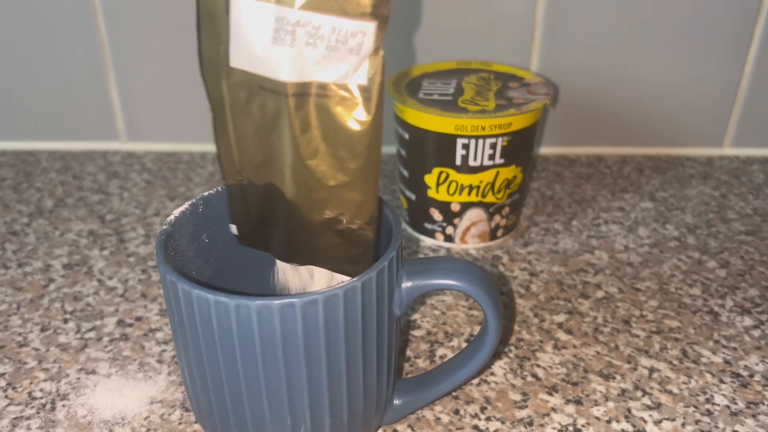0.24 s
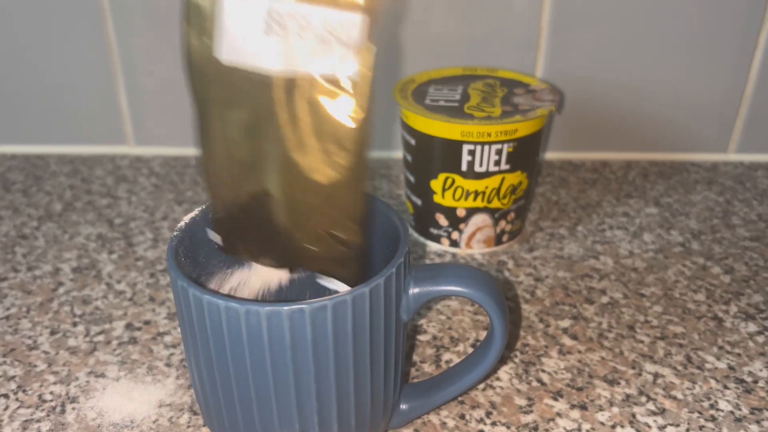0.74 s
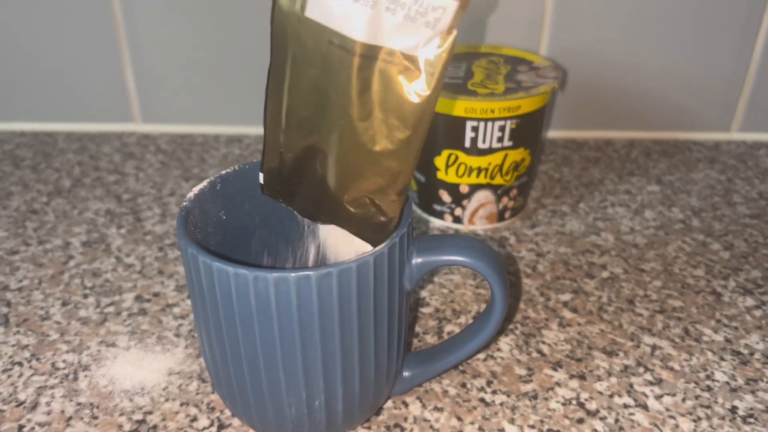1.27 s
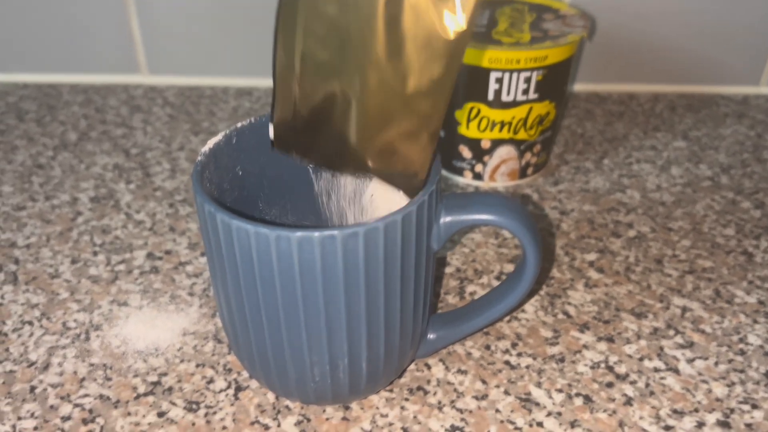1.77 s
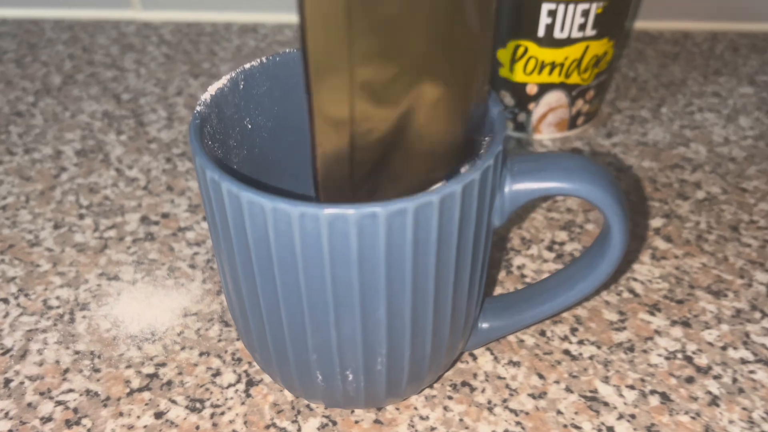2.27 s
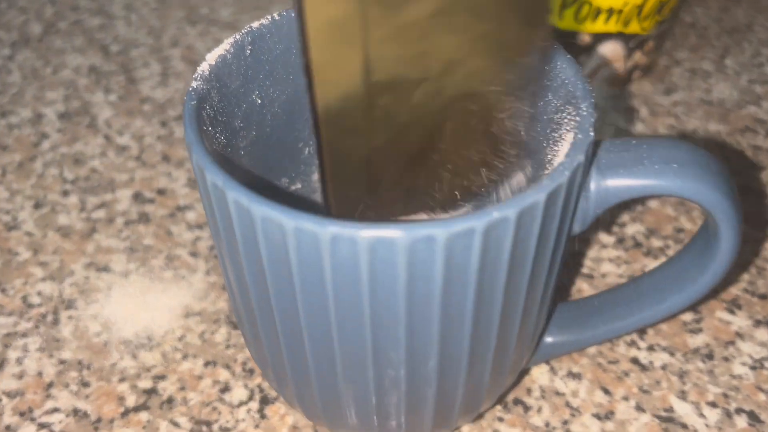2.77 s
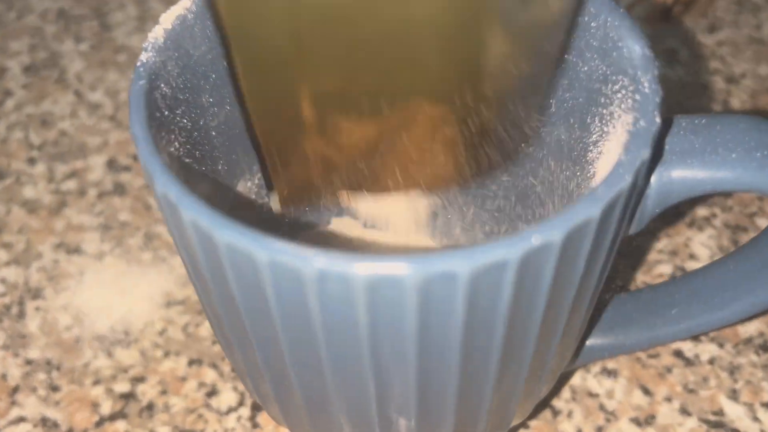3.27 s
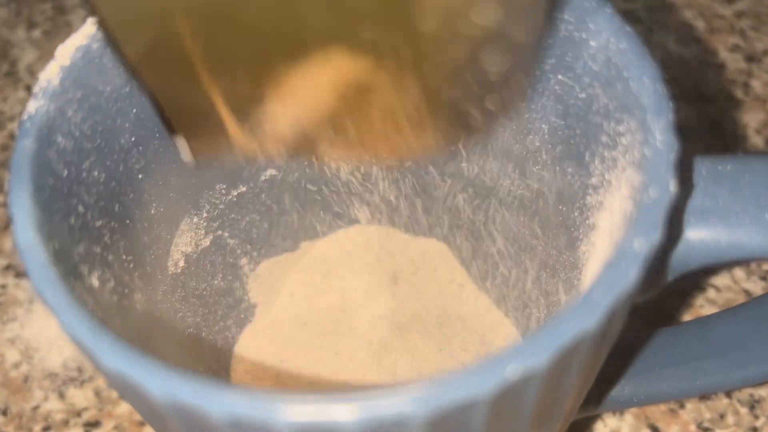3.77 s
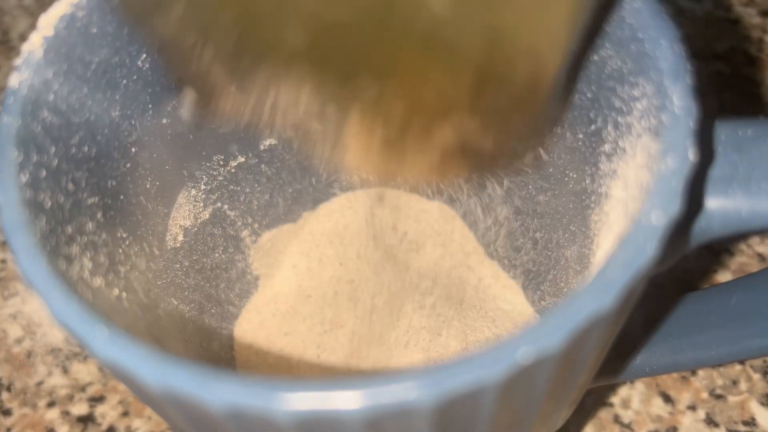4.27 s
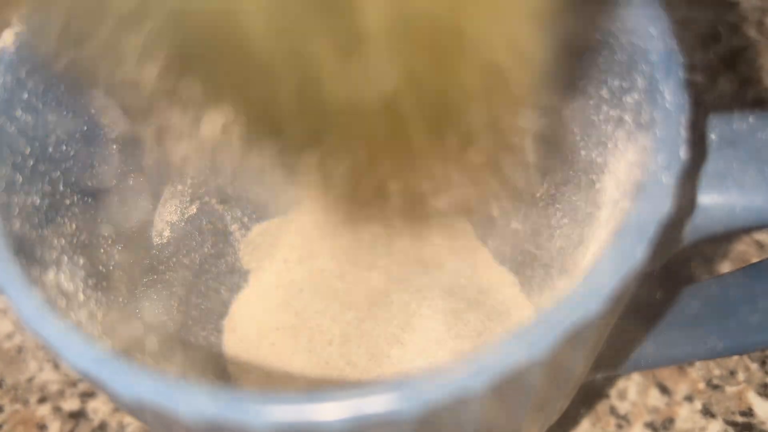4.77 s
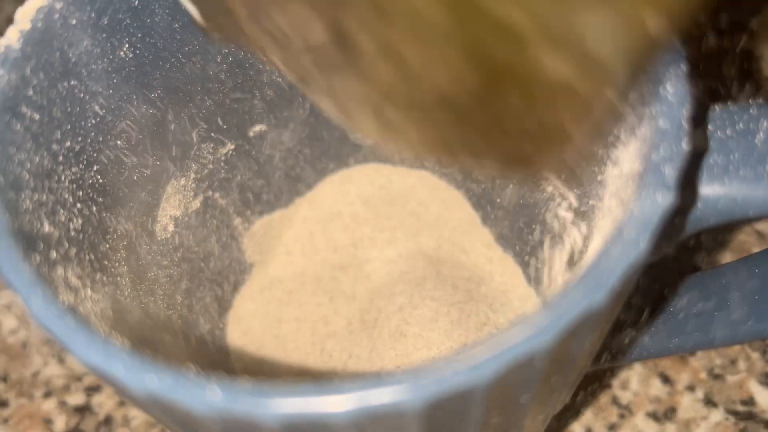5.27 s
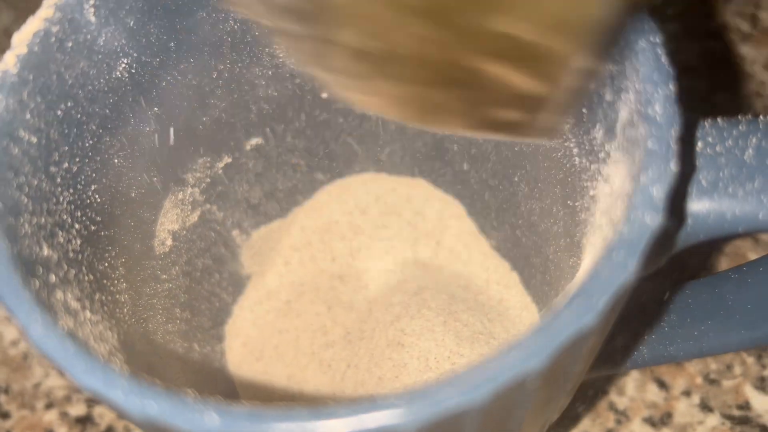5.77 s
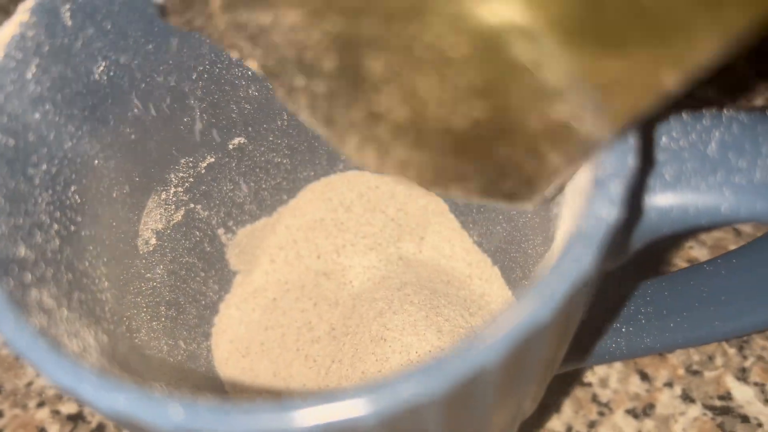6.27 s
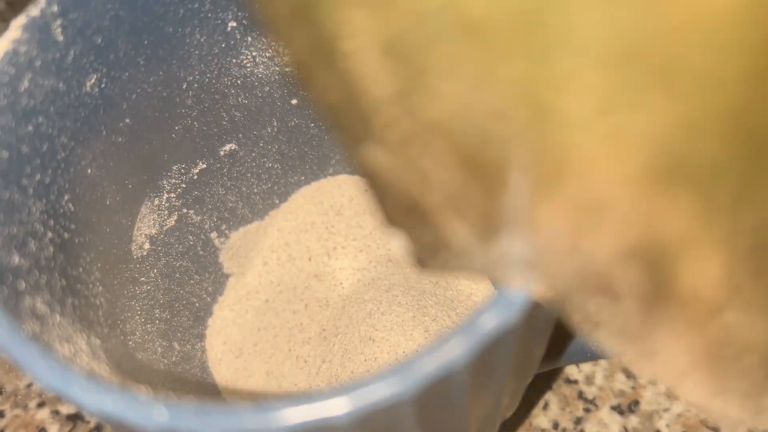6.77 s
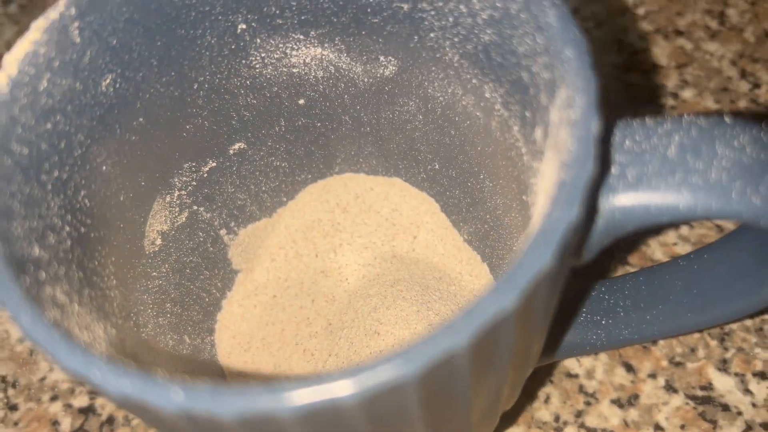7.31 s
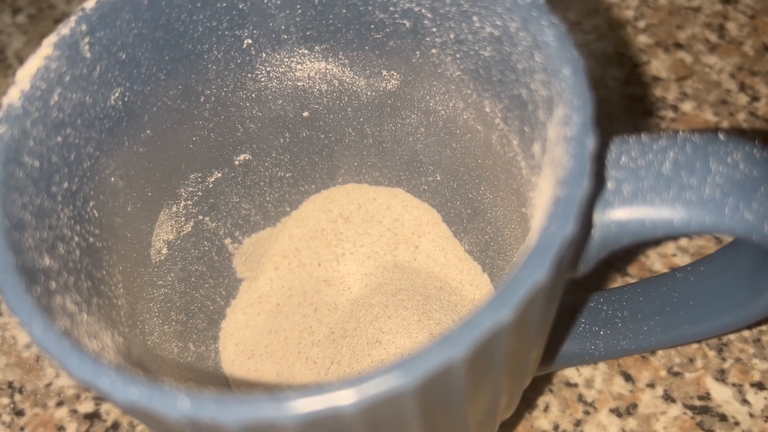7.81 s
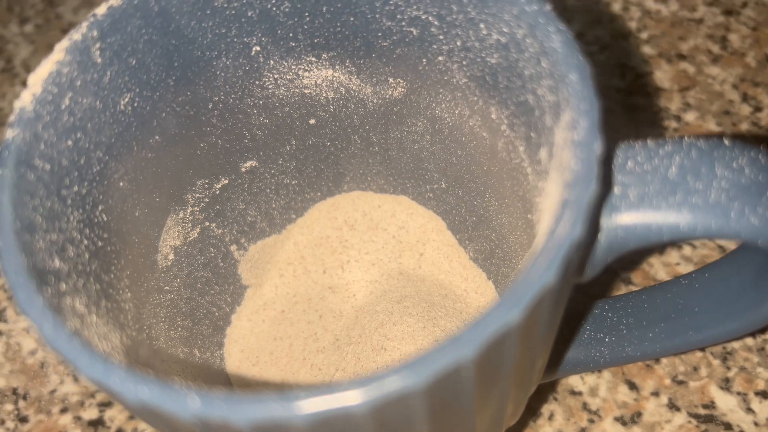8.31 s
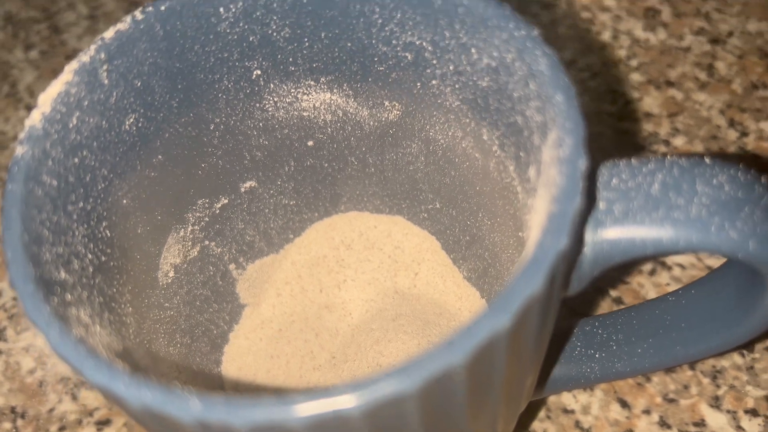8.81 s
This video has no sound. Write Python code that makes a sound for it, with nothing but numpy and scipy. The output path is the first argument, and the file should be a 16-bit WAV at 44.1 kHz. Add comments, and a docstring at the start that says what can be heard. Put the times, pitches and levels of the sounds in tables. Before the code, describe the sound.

A close stereo microphone hears soft powder trickling in gushes and light, regular finger taps on a foil packet. The packet is then shaken harder and faster over a mug, its walls thudding, popping and slapping with a papery, hollow sound that turns brighter as it empties. A short coarse scrape follows as it is pulled away, then crisp foil crackling, a few stray creases, and near silence with a short kitchen echo.

```python
"""A foil sachet of powder is emptied into a mug on a kitchen counter, close to the microphone.
Over a thin hiss of powder (filtered grains) come finger taps, then a few faint knocks (ringing noise bursts).
Shakes grow harder: the walls whump (gliding sines into a ringing hollow), pop, slap and tick, and the last
powder slides down the foil. The sachet then rasps as it is pulled away, and is crumpled: creases snap
and their facets ring briefly. Room tone and the low stir of handling run underneath."""
import sys
import numpy as np
from scipy import signal
from scipy.fft import rfft, irfft, next_fast_len
from scipy.io import wavfile
from scipy.ndimage import map_coordinates

SR = 44100
rng = np.random.default_rng(int(sys.argv[2]) if len(sys.argv) > 2 else 0)


def wav_record(signal):
    """Record a signal, one row per channel, as 16-bit PCM in the file named by sys.argv[1]."""
    frames = np.transpose(np.atleast_2d(signal))
    bounded = np.clip(frames, -1, 1)
    # unit amplitude maps onto the largest positive 16-bit level
    quanta = np.round(bounded * 32767).astype(np.int16)
    wavfile.write(sys.argv[1], SR, quanta)


N = 399105
TIME = np.arange(N) / SR

# Event and curve levels are cue levels: each function adds its own trim in dB.
# The hand and the moving sachet stir the air: start_s, level_db
STIR_CURVE = [(0, -60.5), (1.9, -58), (2.6, -59.5), (4.3, -50.5), (4.85, -49.5), (5.3, -47), (6.1, -45.5),
              (6.55, -58), (6.78, -34.5), (7.0, -51), (7.36, -57), (7.45, -41), (8.5, -65.5), (9.05, -66)]
# Steady trickle of powder: start_s, level_db
TRICKLE_CURVE = [(0, -60.5), (1.15, -62.5), (1.9, -50.5), (2.6, -51), (3.2, -44), (3.45, -49.5),
                 (4.1, -44.5), (4.3, -55), (4.47, -41)]
# Clumps of powder let go as the sachet is jiggled: peak_s, peak_db
POWDER_GUSHES = [(.2, -53.5), (.36, -58.5), (.7, -51), (.77, -54), (.99, -52), (1.35, -60), (1.98, -50.5),
                 (2.11, -52), (2.318, -47), (2.5, -53), (2.657, -47.5), (2.83, -51.5), (3.0, -46),
                 (3.16, -49.5), (3.321, -42), (3.55, -45), (3.69, -57), (3.835, -49.5), (3.911, -46),
                 (4.03, -41.5), (4.19, -55), (4.39, -47)]
# Finger taps, then a few faint knocks on the sachet: start_s, body_db, crack_db, ring_hz
TAPS_AND_KNOCKS = [(0.595, -45.5, -50, 880), (0.687, -47, -38.5, 2490), (0.786, -48.5, -50, 920),
                   (0.955, -46, -70, 900), (1.095, -42, -48, 1740), (1.244, -38, -42, 1910),
                   (1.417, -40, -42.5, 1760), (1.573, -41, -46, 945), (1.716, -35, -53, 1860),
                   (1.887, -38, -43, 970), (2.057, -44.5, -48, 920), (2.178, -58, -50, 700),
                   (2.628, -55.5, -52, 1100), (2.715, -58.5, -63, 500)]
# Wall pops and second slaps around the shakes: start_s, body_db, crack_db, ring_hz
POPS_AND_SECOND_SLAPS = [(3.268, -35, -51, 1650), (3.395, -35.5, -36, 1290), (3.47, -34, -32, 824),
                         (3.644, -33, -29, 795), (3.805, -34, -36, 810), (3.976, -31, -34, 816),
                         (4.096, -35.5, -49, 1060), (4.153, -28, -29.5, 700), (4.305, -28.5, -26.5, 740),
                         (4.813, -25, -18, 740), (4.87, -31, -27, 800), (4.957, -23.5, -31, 800),
                         (5.111, -27, -27, 805), (5.405, -27.5, -31, 1480), (5.455, -37.5, -38, 1600),
                         (5.541, -26.5, -33, 780), (5.602, -42, -47, 1200), (5.646, -38, -54, 1810),
                         (5.696, -26, -47, 1100), (5.771, -40, -61, 860), (5.837, -28.5, -28, 790),
                         (6.03, -28.5, -25, 790), (6.148, -31, -48, 780), (6.337, -44.5, -55, 1100),
                         (6.657, -31.5, -21, 1240), (6.741, -25, -22.5, 2280), (6.786, -43, -49, 1050),
                         (6.81, -39, -48, 1300)]
# Delay of the bounce after an early pop, shorter as the shaking grows harder: start_s, delay_s
REBOUND_DELAY = [(3.27, .031), (4.3, .013)]
# Each shake or squeeze flexes the walls and slaps them together:
# start_s, flex_db, swell_s, first_pitch_hz, glide_s, flex_delay_s, slap_db, crack_db
WALL_SHAKES = [(2.858, -40.5, 0.011, 617, 0.008, 0, -54, -57),
               (3.017, -37, 0.0057, 306, 0.0085, 0.0018, -43.5, -57),
               (3.187, -35, 0.009, 438, 0.0083, 0, -38.5, -62),
               (3.352, -34, 0.0067, 480, 0.0067, 0.0017, -45, -56),
               (3.392, -33, 0.006, 300, 0.0099, 0, -38, -50),
               (3.563, -29, 0.0065, 308, 0.0058, 0.0025, -32.5, -36),
               (3.73, -25, 0.0081, 363, 0.007, 0.0011, -31.5, -55),
               (3.887, -19, 0.0099, 510, 0.0067, 0.0017, -28.5, -28.5),
               (4.052, -29, 0.007, 297, 0.0083, 0.0017, -34, -30.5),
               (4.243, -24.5, 0.011, 298, 0.007, 0.0047, -32.5, -35.5),
               (4.39, -20, 0.0088, 287, 0.0085, 0.0018, -27.5, -25.5),
               (4.472, -17.5, 0.0086, 540, 0.0069, 0.006, -20.5, -16.5),
               (4.544, -15, 0.0082, 426, 0.0073, 0.0023, -34.5, -30),
               (4.647, -15, 0.0058, 540, 0.0078, .002, -21.5, -18),
               (4.722, -10.5, 0.0068, 341, 0.0064, 0.0019, -28.5, -20),
               (4.805, -11, 0.0041, 437, 0.0066, 0.0015, -20, -23),
               (4.878, -14, 0.0072, 368, 0.0059, 0.00098, -25.5, -27.5),
               (4.945, -8, 0.0032, 435, 0.012, 0.0009, -22.5, -23.5),
               (5.02, -11, 0.0081, 400, 0.0065, 0.000018, -30, -23),
               (5.102, -26.5, 0.0044, 460, 0.0063, 0.0024, -28.5, -28),
               (5.195, -16.5, 0.0074, 400, 0.012, 0, -28.5, -19),
               (5.336, -18.5, 0.0046, 466, 0.015, 0.00013, -33, -29),
               (5.487, -21.5, 0.0055, 384, 0.0094, 0.0031, -46, -32),
               (5.656, -17.5, 0.0096, 398, 0.016, 0, -30.5, -27.5),
               (5.801, -16.5, 0.0063, 490, 0.014, 0.0032, -35, -33.5),
               (5.908, -9, 0.004, 420, 0.017, 0, -22.5, -23),
               (6.109, -13, 0.0048, 442, 0.023, 0.0048, -20.5, -23),
               (6.237, -8.5, 0.0054, 463, 0.014, 0.00011, -21.5, -19.5),
               (6.407, -11, 0.0041, 450, 0.014, 0.0009, -25.5, -24.5),
               (6.734, -19, 0.0038, 434, 0.015, 0.00074, -33, -26),
               (6.751, -12, 0.0083, 427, 0.0066, 0, -35.5, -38),
               (6.835, -20.5, 0.01, 457, 0.0086, 0, -34, -30),
               (7.166, -33.5, 0.0049, 430, 0.0084, 0, -44, -40.5),
               (7.402, -21.5, 0.016, 150, 0.01, 0, -38, -37.5),
               (7.442, -25, 0.013, 149, 0.0078, 0, -31, -33.5),
               (7.843, -35, 0.0056, 445, 0.0054, 0, -54, -50),
               (7.966, -31, 0.0041, 404, 0.0074, 0.0038, -32.5, -38),
               (8.088, -44, 0.0096, 497, 0.0078, 0, -31.5, -42),
               (8.158, -26.5, 0.01, 390, 0.008, 0, -39, -37)]
# How strongly the hollow sachet rings: start_s, level_db (against the flex)
HOLLOW_LEVEL = [(2.8, -4.5), (4.3, -19.5), (5.05, -11.5), (5.3, -3), (6.4, -9), (6.8, -9.5), (7.3, -23.5),
                (8.2, -6.5)]
# Loose powder sliding along the foil after each hard shake: start_s, level_db, slide_length_s
LOOSE_POWDER = [(4.47, -31, 0.074), (4.55, -40, 0.047), (4.65, -38.5, 0.036), (4.8, -35, 0.029),
                (4.88, -41, 0.018), (4.95, -35, 0.029), (5.02, -48, 0.015), (5.1, -37.5, 0.069),
                (5.2, -34.5, 0.055), (5.34, -34, 0.041), (5.49, -31.5, 0.049), (5.9, -33, 0.022),
                (6.11, -37, 0.017), (6.24, -29.5, 0.021), (6.41, -42, 0.03), (6.85, -46, 0.05)]
# Lone sharp ticks of the foil between shakes: start_s, level_db
FOIL_FLICKS = [(4.231, -41), (4.336, -36), (4.579, -28), (4.663, -20.5), (5.563, -36.5), (5.714, -36),
               (6.299, -36), (6.385, -40.5)]
# The sachet drags over the rim, later through the fingers; one list per drag: start_s, level_db
DRAG_CURVES = [
    [(6.68, -47), (6.729, -36.5), (6.738, -14.5), (6.758, -8.5), (6.783, -33.5), (6.812, -18.5),
     (6.85, -29), (6.89, -50.5), (6.915, -28.5), (6.96, -55)],
    [(7.95, -47), (8.035, -49), (8.055, -37), (8.12, -61)],
]
# Fine crackle of the foil in the hand; one list per spell: start_s, level_db
CRUSH_CURVES = [
    [(4.42, -56), (4.5, -42), (4.62, -48.5), (5.25, -54), (5.45, -52)],
    [(6.652, -38), (6.82, -52.5), (6.9, -43), (6.94, -59)],
    [(7.38, -41), (7.44, -39), (7.55, -27), (7.6, -36.5), (7.86, -44.5), (8.15, -44), (8.22, -62)],
]
# The loudest creases snap: start_s, level_db, facet_pitch_hz (middle of its drop), tick_db
CREASE_SNAPS = [(5.981, -35, 3120, -37), (6.509, -44.5, 4300, -52), (6.654, -30, 2740, -35),
                (6.679, -32, 2580, -26), (6.773, -26, 2500, -23), (6.856, -22, 2640, -42),
                (7.167, -40.5, 3200, -34), (7.392, -16, 2180, -31), (7.397, -17.5, 3070, -27.5),
                (7.409, -16.5, 2700, -38), (7.429, -14.5, 4430, -14.5), (7.436, -14, 4600, -23.5),
                (7.444, -19.5, 3160, -32), (7.452, -22.5, 3930, -34), (7.465, -20, 2480, -22),
                (7.496, -22, 4170, -35), (7.503, -22.5, 3420, -17), (7.510, -24, 4670, -23),
                (7.518, -20.5, 2080, -26), (7.527, -25, 3130, -36.5), (7.547, -21.5, 3460, -20.5),
                (7.564, -15, 3050, -17), (7.582, -20, 3340, -31), (7.596, -25, 3400, -30),
                (7.607, -27.5, 3240, -23), (7.632, -29.5, 2920, -41), (7.637, -32, 2850, -28),
                (7.682, -24, 2930, -32), (7.700, -25, 3320, -26), (7.709, -23.5, 3300, -37),
                (7.728, -27.5, 3140, -28), (7.734, -24.5, 2980, -28), (7.804, -38.5, 4140, -28.5),
                (7.846, -22.5, 3090, -31), (7.857, -38, 6100, -28), (7.921, -26, 4900, -26),
                (7.966, -23, 3540, -20.5), (8.088, -21.5, 2940, -21), (8.149, -37, 3070, -40),
                (8.166, -34.5, 3660, -28.5), (8.330, -35.5, 3100, -30)]

# Relative spectrum of the room tone: frequency_hz, level_db (per Hz)
ROOM_TONE_COLOUR = [(25, -18), (55, -9.5), (100, -8), (170, -12), (300, -39.5), (550, -29.5), (1100, -15),
                    (2000, -17), (3500, -24), (7000, -25.5), (10000, -30.5), (13000, -32), (15000, -26.5),
                    (16000, -43)]
# Relative spectrum of the stirred air: frequency_hz, level_db (per Hz)
RUMBLE_COLOUR = [(20, -36), (45, 0), (70, 0.5), (120, -5.5), (200, -14.5), (400, -17), (1000, -37)]
# Relative spectrum of the falling powder: frequency_hz, level_db (per Hz)
POWDER_COLOUR = [(700, -8), (1200, -7.5), (2000, -1.5), (3200, 0.5), (5000, -0.5), (7000, 0.5),
                 (10000, -1.5), (12500, 2.5), (14500, 4.5), (15500, -3.5)]
# Relative spectrum of powder sliding on foil: frequency_hz, level_db (per Hz)
SLIDING_COLOUR = [(500, 9.5), (900, 0), (1600, 0), (2400, 4), (4200, 0), (7000, -3.5), (10000, -4),
                  (13500, 0), (15800, -6.5)]
# Relative spectrum of the dragging rasp: frequency_hz, level_db (per Hz)
RASP_COLOUR = [(120, -7), (230, 1.5), (380, 1.5), (480, -3.5), (590, -3.5), (720, -21), (1200, -21),
               (2500, -29), (5000, -56)]
# Relative spectrum of the body of a tap or knock: frequency_hz, level_db (per Hz)
TAP_COLOUR = [(100, -15.5), (180, 2), (260, -5.5), (360, 4.5), (540, -9), (720, -5.5), (950, 0),
              (1300, -10.5), (2000, -5), (2600, -18.5), (4000, -27), (8000, -20.5)]
# Relative spectrum of the body of a pop or second slap: frequency_hz, level_db (per Hz)
POP_COLOUR = [(200, -3), (400, 1), (650, -0.5), (950, 1), (1300, -2.5), (1700, -4.5), (2300, -5.5),
              (3200, -5.5), (5000, -39)]
# Relative spectrum of a slap's body: frequency_hz, level_db (per Hz)
SLAP_COLOUR = [(150, -5), (350, 1), (520, 6.5), (650, -3), (850, -3.5), (1100, -6), (1500, -6.5),
               (1750, -8.5), (2250, -3.5), (2800, -10), (5000, -19.5)]
# Relative spectrum of the crack in each of these blows: frequency_hz, level_db (per Hz)
CRACK_COLOUR = [(1200, -6), (2300, 5), (3200, 1.5), (4300, 0), (6000, 0.5), (8000, -5.5), (10000, -6),
                (13000, -5), (15000, -20.5), (16000, 3.5)]
# Relative spectrum of a tiny sharp tick of the foil: frequency_hz, level_db (per Hz)
TICK_COLOUR = [(1000, -4), (3000, -23.5), (6000, -3.5), (9000, -6), (13000, 0), (16000, 0)]
# Relative spectrum of rustling, crackling foil: frequency_hz, level_db (per Hz)
FOIL_COLOUR = [(200, -1), (450, -1), (900, -4), (1700, -5), (3200, -1), (4500, -3), (7000, -6),
               (10000, -10), (13000, -15), (15000, -7), (16000, -27)]

# Resonances of the hollow sachet in the mug: frequency_hz, width_hz, level_db
HOLLOW_MODES = [(198, 142, 4.5), (280, 85, 2), (340.5, 84, 0.5), (462, 64, -8), (500, 123, -7.5)]
# Brighter resonances of the foil and the mug around it: frequency_hz, width_hz, level_db
BRIGHT_MODES = [(1520, 110, 11), (3300, 220, 7), (4120, 120, 16), (2270, 140, 8.5), (5030, 79, 6.5)]
# Low resonances of the counter and the room: frequency_hz, width_hz, level_db
BOOM_MODES = [(72.8, 31, 12.5), (114, 7.2, -7), (179, 4.06, -2.5)]
# Decay of the kitchen by pitch: frequency_hz, t60_s
KITCHEN_T60 = [(150, 0.27), (500, 0.24), (1500, 0.39), (4000, 0.37), (9000, 0.11), (15000, 0.075)]
# Likeness of the two microphone ports: frequency_hz, likeness (clipped to 0..1 in use)
PORT_LIKENESS = [(200, 1.47), (550, 0.33), (1300, 0.31), (2000, 0.83), (4500, 0.19), (8000, 0.06),
                 (10500, 0.79), (15000, 1.3)]
# Phase by which the left port leads: frequency_hz, lead_rad
PORT_LEAD = [(20, -0.5), (500, 1.44), (1000, 2.5), (2000, 1.5), (4000, 1.5), (7000, 0.5), (9500, 3.5),
             (11200, 1.45), (12800, 0.5), (15500, -3)]
# Level step between the ports: frequency_hz, left_minus_right_db
PORT_BALANCE = [(60, 3), (350, 3.5), (650, 4), (1100, 9.5), (2000, -1), (4800, 2.5), (9000, -1.5),
                (15000, 0.3)]

GUSH_RISE_S, GUSH_FALL_S = 0.022, 0.026
POWDER_GONE_S = 5.05
TAP_DECAY_S, POP_DECAY_S = 0.0055, 0.0029
REBOUND_DB, REBOUND_CRACK_DB = -10, -28  # a bounce is weaker and duller than its pop
SLACK_HZ = 45.4  # pitch that a flexing wall sinks to
SLAP_FULL_S, SLAP_EMPTY_S = 0.0053, 0.0064  # decay of a slap: powder damps it
SLAP_FULL_HZ, SLAP_EMPTY_HZ = 950, 2190  # centre of the slap's ring: powder weighs the wall down
SLAP_RING_SPREAD = 0.29  # octaves around that centre: the wall lies differently at each shake
CLAP_S, CLAP_DB = 0.007, -4.5  # the empty walls clap a second time, weaker
RUSTLE_LEAD_S = 0.0031
FACET_SAG, FACET_SAG_S = 0.12, 0.0025  # share of its pitch that a relaxing facet drops, and how fast
SMALL_CREASES_PER_S = 77
LOW_CUT_HZ, EDGE_HZ = 34, 16300  # the microphones lose the deepest bass; upper band limit


def amp(db):
    """Turns decibels into a gain."""
    return 10 ** (np.asarray(db) / 20)


def evened(x):
    """Scales a signal to unit power."""
    return x / np.sqrt(np.mean(x ** 2) + 1e-20)


def read(points, hz):
    """Reads a curve along a logarithmic frequency axis."""
    f, value = np.transpose(points)
    return np.interp(np.log(hz + 1), np.log(f + 1), value)


def at_time(points, s):
    """Reads a two-column time curve at s seconds."""
    return np.interp(s, *np.transpose(points))


def level(rows):
    """A dB curve as a gain for each sample, at -120 dB outside its span."""
    s, db = np.transpose(rows)
    return amp(np.interp(TIME, s, db, left=-120, right=-120))


def add(mix, s, sound):
    """Lays a sound into the mix from s seconds on."""
    part = mix[:, max(round(s * SR), 0):][:, :sound.shape[-1]]
    part += sound[..., :part.shape[1]]


def clock(size):
    """Seconds since the start of a sound of that many samples."""
    return np.arange(size) / SR


def held(x, span):
    """Scales a burst to the energy of unit level held for span seconds."""
    return x * np.sqrt(span * SR / (np.sum(x ** 2, -1, keepdims=True) + 1e-20))


def colour(x, points, lag_cycles=0, size=4096):
    """Causal filter of unit power; with a lag, low notes arrive late, as bending waves do."""
    hz = np.fft.rfftfreq(size, 1 / SR)
    bass_rolloff = 1 + (points[0][0] / 2 / (hz + 1)) ** 2
    gain = amp(read(points, hz)) / bass_rolloff
    log_gain = np.log(np.maximum(evened(gain), 1e-5))
    # the Hilbert transform of the log gain gives the minimum phase
    minimum_phase = np.conj(signal.hilbert(np.r_[log_gain, log_gain[-2:0:-1]]))[:len(hz)]
    lag = 2j * np.pi * lag_cycles * np.log(1 + hz / 60)
    impulse = irfft(np.exp(minimum_phase - lag))
    return signal.oaconvolve(x, impulse[None], axes=1)[:, :N]


def grains(per_s, spread_db, smooth):
    """Ticks of very unequal size over a smooth hiss, at unit level."""
    strikes = rng.random(N) < per_s / SR
    size = amp(spread_db * np.minimum(rng.exponential(1, N), 4)) * strikes
    power = signal.lfilter([1], [1, -np.exp(-1 / 12)], size ** 2)  # power of a tick fades over 12 samples
    envelope = np.sqrt(power / power.mean() + smooth ** 2)
    return evened(envelope * rng.standard_normal((2, N)))


def lumps(depth_db, per_s):
    """An uneven gain: many small contacts bunch and thin out."""
    knots = np.cumsum(rng.exponential(1, 20000)) / per_s
    heights = rng.uniform(-1, 1, len(knots))
    return evened(amp(depth_db * np.interp(TIME, knots, heights)))


def ringing(x, modes):
    """Passes sound through a set of damped modes, at unit power gain for white noise."""
    t = clock(size=16000)
    ring = np.zeros(len(t))
    for hz, width, db in modes:
        decay = np.exp(-np.pi * width * t)
        ring += amp(db) * np.sqrt(width) * decay * np.cos(2 * np.pi * hz * t)
    return signal.oaconvolve(x, ring[None] / np.linalg.norm(ring), axes=1)[:, :N]


def bending(x, patchy_db=2.5, patch_hz=420, patch_s=.022):
    """As the foil bends, different facets radiate: patches of the spectrum come and go."""
    hz, t, z = signal.stft(x, SR, nperseg=512, noverlap=384)
    at = np.meshgrid(np.minimum(hz / patch_hz, 99), np.minimum(t / patch_s, 999), indexing="ij")
    field = evened(map_coordinates(rng.uniform(-1, 1, (100, 1000)), at, order=1))
    patched = z * evened(amp(patchy_db * field))
    return signal.istft(patched, SR, nperseg=512, noverlap=384)[1][:, :N]


def blows(rows, body_colour, lag_cycles, body_db, crack_db, crack_share, swell_share, lumpy_db,
          ring_db, ring_width_hz, smack_db):
    """Each blow smacks the wall, sends a falling chirp through it and rattles tiny contacts off its creases."""
    body, crack, t = np.zeros((2, N)), np.zeros((2, N)), clock(size=3000)
    contacts = lumps(lumpy_db, per_s=670)
    smack = amp(smack_db) * held(signal.unit_impulse(len(t), round(.0006 * SR)), 0.66)
    for s, low_db, high_db, ring_hz, decay in rows:
        body_noise, crack_noise = rng.standard_normal((2, 2, len(t)))
        rise = (1 - np.exp(-t / (swell_share * decay))) ** 2
        push = held(smack + held(body_noise * rise * np.exp(-t / decay), 1), 0.009)
        ring = signal.lfilter(*signal.iirpeak(ring_hz, ring_hz / ring_width_hz, SR), push)
        add(body, s, amp(low_db) * (push + amp(ring_db) * ring))
        rattle = contacts[round(s * SR):][:len(t)]
        burst = crack_noise * rise * rattle * np.exp(-t / (decay * crack_share))
        add(crack, s, amp(high_db) * held(burst, 0.0064))
    body = amp(body_db) * colour(body, body_colour, lag_cycles)
    return body + amp(crack_db) * colour(crack, CRACK_COLOUR)


def background(tone_db=-58, stir_db=-1):
    """Steady room tone and the low stir of handling, both as filtered noise."""
    tone, stir = rng.standard_normal((2, 2, N))
    tone = amp(tone_db) * colour(tone, ROOM_TONE_COLOUR)
    return tone + amp(stir_db) * colour(stir * level(STIR_CURVE), RUMBLE_COLOUR)


def kitchen(x, near_db=-11, near_decay=0.009, far_db=-17):
    """Quick echoes off mug, counter and tiles, then the short tail of the room."""
    t = clock(size=26000)
    near, far = rng.standard_normal((2, 2, len(t)))
    sparse = rng.random(near.shape) < .05
    near *= sparse * (t > .002) * np.exp(-t / near_decay)
    hz, age, z = signal.stft(far * (1 - np.exp(-t / 0.003)), SR, nperseg=256)
    fade = amp(-60 * age / read(KITCHEN_T60, hz)[:, None])
    far = signal.istft(z * fade, SR, nperseg=256)[1][:, :len(t)]
    echo = amp(near_db) * held(near, 1 / SR) + amp(far_db) * held(far, 1 / SR)
    return signal.fftconvolve(x, echo, axes=1)[:, :N]


def dragging(drag_db=0):
    """The slack sachet catches and slips, and its hollow gives each slip a throaty rasp."""
    slips = sum(level(rows) for rows in DRAG_CURVES) * grains(354, 2.8, 0.7)
    return colour(amp(drag_db) * slips, RASP_COLOUR)


def tightening(rustle_db=-13):
    """The foil rustles as it draws tight, swelling up to each slap."""
    rustle, t = np.zeros((2, N)), clock(size=2000)
    for s, *_, crack in WALL_SHAKES:
        add(rustle, s - t[-1], amp(crack + rustle_db) * np.exp(-t[::-1] / RUSTLE_LEAD_S))
    return colour(rustle * grains(1103, 1.5, 0.383), FOIL_COLOUR)


def ticks(slap_db=-6, crease_db=-1, tick_s=0.00026):
    """The foil ticks sharply at each slap and crease; stray ticks fall between the hard shakes."""
    out, t = np.zeros((2, N)), clock(size=300)
    rows = FOIL_FLICKS + [(s, crack + slap_db) for s, *_, crack in WALL_SHAKES]
    rows = rows + [(s, db + crease_db) for s, *_, db in CREASE_SNAPS]
    for s, db in rows:
        burst = rng.standard_normal((2, len(t))) * np.exp(-t / tick_s)
        add(out, s, amp(db) * held(burst, 0.0054))
    return colour(out, TICK_COLOUR)


def crinkles(snap_decay=0.0022, ring_decay=0.0019, ring_db=-5.5, flutter_db=-8, snap_db=-1,
             crackle_db=-3.0, small_db=-8):
    """A crease snaps through and its facet rings briefly; tiny creases crackle between."""
    snaps, t = np.zeros((2, N)), clock(size=2000)
    for s, db, hz, _ in CREASE_SNAPS:
        snap_noise, flutter_noise = rng.standard_normal((2, 2, len(t)))
        # pitch starts half the sag above the middle and ends half below
        turns = np.cumsum(hz * (1 + FACET_SAG * (np.exp(-t / FACET_SAG_S) - .5))) / SR
        ring = np.exp(-t / ring_decay) * np.sin(2 * np.pi * (turns + rng.random((2, 1))))
        snap = held(snap_noise * np.exp(-t / snap_decay), 0.62) + amp(ring_db) * held(ring, 0.79)
        add(snaps, s, amp(db + snap_db) * held(snap, 0.0015))
        # the facet starts to flutter just before it gives way
        flutter = held(flutter_noise * t * np.exp(-t / 0.0027), 0.0078)
        add(snaps, s - .002, amp(db + flutter_db) * flutter)
    crackle = amp(crackle_db) * grains(2200, 5.7, 0.3)
    crackle = crackle + amp(small_db) * grains(SMALL_CREASES_PER_S, 3.3, 0)
    return colour(snaps + sum(level(rows) for rows in CRUSH_CURVES) * crackle, FOIL_COLOUR)


def taps_and_knocks():
    """Finger taps, then a few faint knocks on the sachet: short thuds with a ring and a longer crack."""
    rows = [(*row, TAP_DECAY_S) for row in TAPS_AND_KNOCKS]
    return blows(rows, TAP_COLOUR, lag_cycles=0.885, body_db=-1.0, crack_db=3.5, crack_share=3.3,
                 swell_share=0.047, lumpy_db=1.5, ring_db=0.5, ring_width_hz=820, smack_db=-0.5)


def pops_and_second_slaps():
    """Wall pops and second slaps around the shakes; early pops bounce once while powder loads the walls."""
    rows = [(*row, POP_DECAY_S) for row in POPS_AND_SECOND_SLAPS]
    for s, body, crack, hz in POPS_AND_SECOND_SLAPS:
        if s < LOOSE_POWDER[0][0]:
            later = s + at_time(REBOUND_DELAY, s)
            rows.append((later, body + REBOUND_DB, crack + REBOUND_CRACK_DB, hz, POP_DECAY_S))
    return blows(rows, POP_COLOUR, lag_cycles=1.074, body_db=-2.0, crack_db=-1.5, crack_share=0.84,
                 swell_share=0.06, lumpy_db=10.0, ring_db=2, ring_width_hz=146, smack_db=-5)


def slaps():
    """The walls slap together at each shake, and ring higher and longer once the powder is gone."""
    full, empty = (SLAP_FULL_HZ, SLAP_FULL_S), (SLAP_EMPTY_HZ, SLAP_EMPTY_S)
    rows = []
    for s, *_, body, crack in WALL_SHAKES:
        rows.append((s, body, crack, *(full if s < POWDER_GONE_S else empty)))
        if POWDER_GONE_S < s < LOOSE_POWDER[-1][0]:
            rows.append((s + CLAP_S, body + CLAP_DB, crack + CLAP_DB, *empty))
    shifts = 2 ** (SLAP_RING_SPREAD * rng.standard_normal(len(rows)))
    rows = [(*blow, hz * shift, decay) for (*blow, hz, decay), shift in zip(rows, shifts)]
    return blows(rows, SLAP_COLOUR, lag_cycles=1.389, body_db=-1.0, crack_db=-0.5, crack_share=0.42,
                 swell_share=0.14, lumpy_db=11.5, ring_db=-3.5, ring_width_hz=600, smack_db=-4.5)


def flexes(ring_decay=0.011, whump_db=0, hollow_db=-2):
    """A wall bellies out and slackens, so its pitch drops; the hollow behind it rings on."""
    whump, push, t = np.zeros((2, N)), np.zeros((2, N)), clock(size=6000)
    for s, db, swell, first_hz, glide, delay, *_ in WALL_SHAKES:
        turns = np.cumsum(SLACK_HZ + (first_hz - SLACK_HZ) * np.exp(-t / glide)) / SR
        shape = (t / swell * np.exp(1 - t / swell)) ** 2
        add(whump, s + delay, amp(db + whump_db) * shape * np.sin(2 * np.pi * turns))
        puff = held(rng.standard_normal(len(t)) * np.exp(-t / ring_decay), 0.015)
        add(push, s + delay + swell, amp(db + hollow_db + at_time(HOLLOW_LEVEL, s)) * puff)
    ring = np.zeros(len(t))
    for k, (hz, width, db) in enumerate(HOLLOW_MODES):
        mode = np.exp(-np.pi * width * t) * np.sin(2 * np.pi * hz * t)
        ring += (-1) ** k * amp(db) * mode  # neighbouring modes move in opposite directions
    ring = signal.sosfilt(signal.butter(2, 650, fs=SR, output="sos"), ring)
    return whump + signal.oaconvolve(push, ring[None] / np.linalg.norm(ring), axes=1)[:, :N]


def slides(slide_db=0, die=0.014):
    """Each hard shake throws the last powder down the sachet in clumps of fine grains."""
    rush, t = np.zeros((2, N)), clock(size=9000)
    when, db, length = np.transpose(LOOSE_POWDER)
    for s, *_ in WALL_SHAKES:
        if when[0] < s < when[-1]:
            fall = np.exp(-np.maximum(t - np.interp(s, when, length), 0) / die)
            shape = (1 - np.exp(-t / 0.0044)) * fall
            add(rush, s, amp(np.interp(s, when, db)) * shape)
    powder = rush * grains(2500, 1.4, 0.34) * lumps(8.7, per_s=290)
    return colour(amp(slide_db) * powder, SLIDING_COLOUR)


def stream(flow_db=1, coarse_db=-8):
    """Countless fine grains hiss along the foil in a trickle and gushes; coarse crumbs tick on it."""
    flow = level(TRICKLE_CURVE)
    for s, db in POWDER_GUSHES:
        age = TIME - s
        spread = np.where(age < 0, GUSH_RISE_S, GUSH_FALL_S)
        flow = flow + amp(db) * np.exp(-np.minimum((age / spread) ** 2 / 2, 20))
    crumbs = bending(colour(amp(coarse_db) * flow * grains(150, 2.0, 0), FOIL_COLOUR))
    hiss = flow * grains(3200, 0.86, 0.62) * lumps(6.3, per_s=150)
    return crumbs + colour(amp(flow_db) * hiss, POWDER_COLOUR)


def scene():
    """Taps, shakes, powder and crumpling, heard with the counter and the kitchen."""
    taps = taps_and_knocks()
    creases = crinkles() * amp(np.array([[1.2], [-1.2]]))  # crumpled a little to the left
    foil = bending(slaps() + slides() + creases)
    foil = foil + amp(-20) * ringing(foil, BRIGHT_MODES)
    bright = foil + pops_and_second_slaps() + ticks() + tightening() + stream()
    low = flexes() + dragging()
    boom = ringing(amp(-9) * taps + amp(-28.5) * low, BOOM_MODES)
    echoes = kitchen(bright + amp(5.5) * taps + amp(-8.0) * low)
    return taps + bright + low + boom + echoes + background()


def record(dry):
    """Two ports hear the scene partly alike, with a phase lead and a level step; then the band limit."""
    size = next_fast_len(N + 4096)
    hz, (left, other) = np.fft.rfftfreq(size, 1 / SR), rfft(dry, size)
    same = np.clip(read(PORT_LIKENESS, hz), 0, 1)
    right = same * left + 1j * np.sqrt(1 - same ** 2) * other
    right = right * np.exp(-1j * read(PORT_LEAD, hz))
    step = amp(read(PORT_BALANCE, hz) / 2)
    ports = irfft(np.array([left * step, right / step]), size)[:, :N]
    ports = signal.sosfilt(signal.butter(2, LOW_CUT_HZ, "high", fs=SR, output="sos"), ports)
    ports = np.tanh(ports)  # the sharpest peaks are rounded off
    band_limit = signal.firwin(255, EDGE_HZ, window=("kaiser", 9), fs=SR)
    return signal.oaconvolve(ports, band_limit[None], "same")


dry = scene()
out = record(dry)
wav_record(out)
```